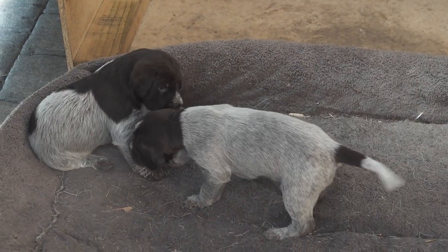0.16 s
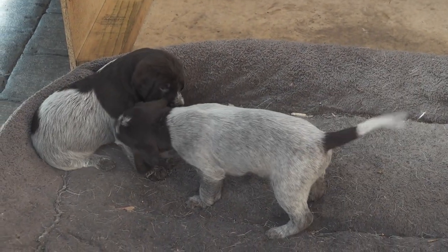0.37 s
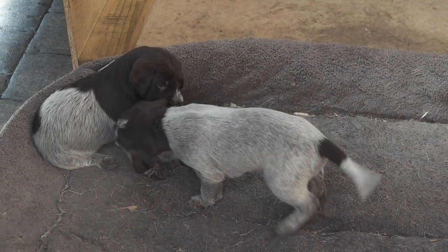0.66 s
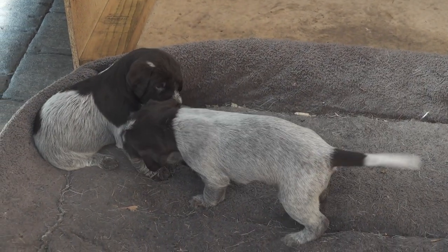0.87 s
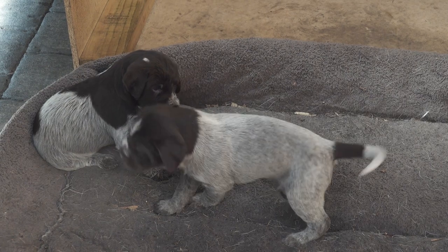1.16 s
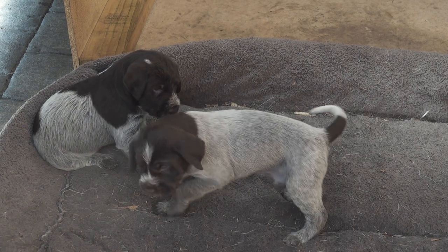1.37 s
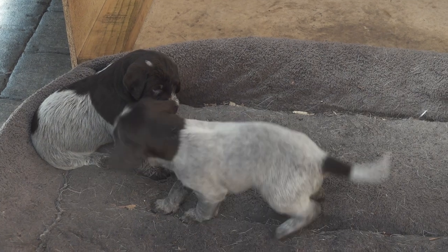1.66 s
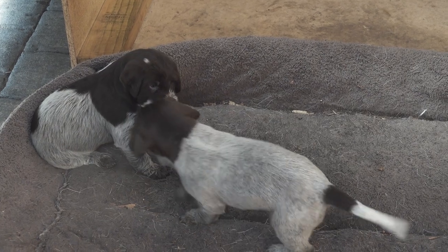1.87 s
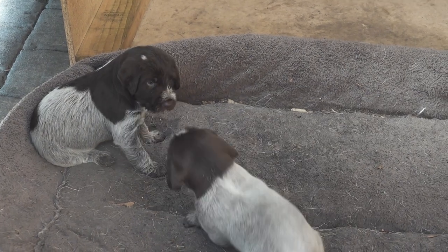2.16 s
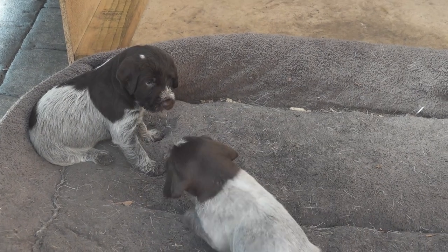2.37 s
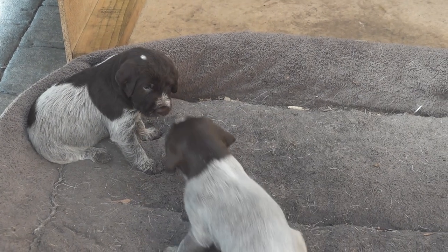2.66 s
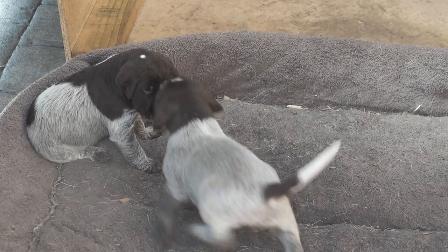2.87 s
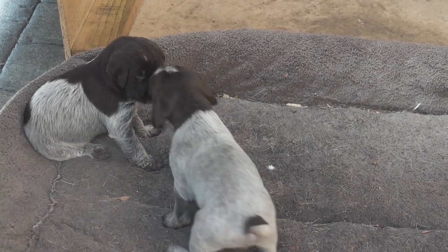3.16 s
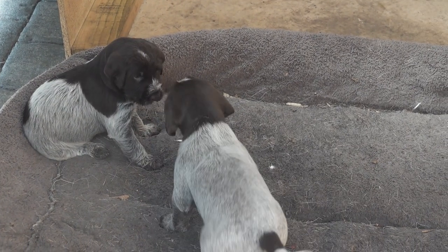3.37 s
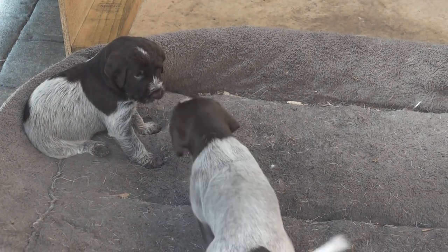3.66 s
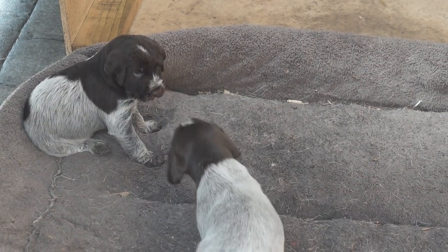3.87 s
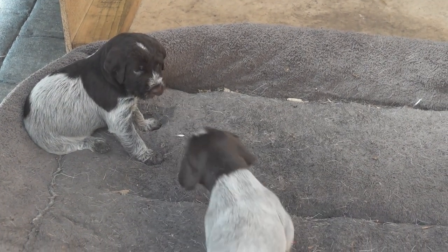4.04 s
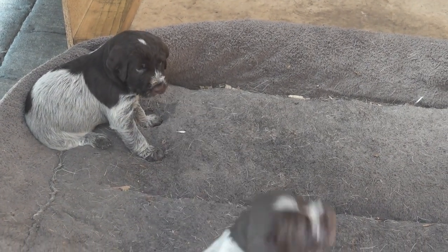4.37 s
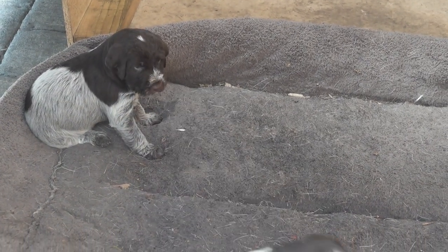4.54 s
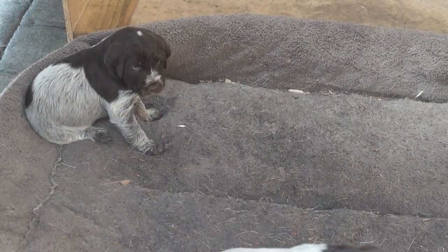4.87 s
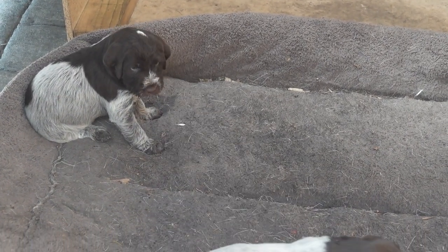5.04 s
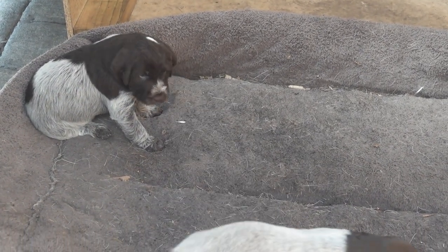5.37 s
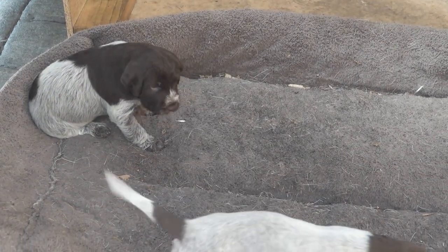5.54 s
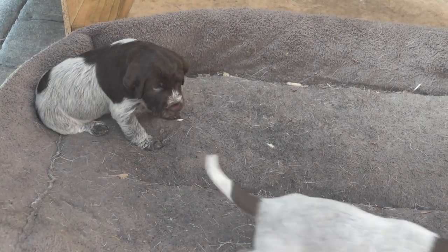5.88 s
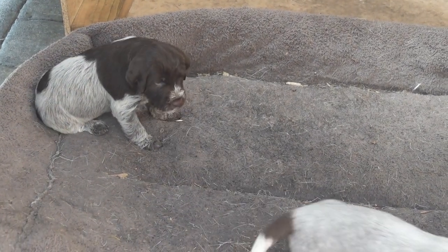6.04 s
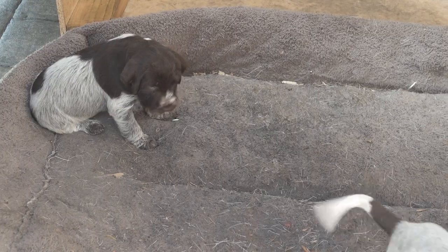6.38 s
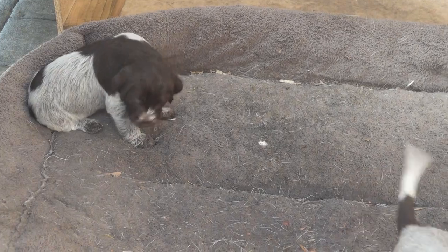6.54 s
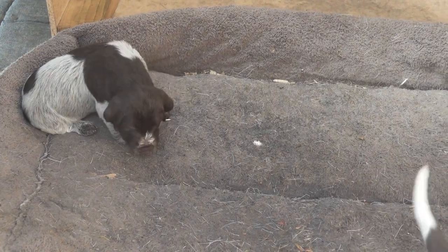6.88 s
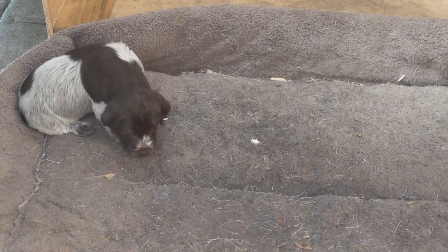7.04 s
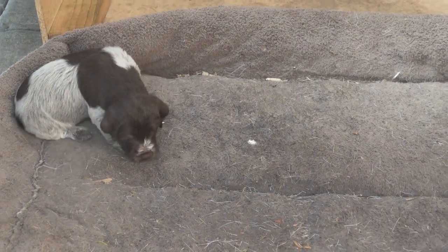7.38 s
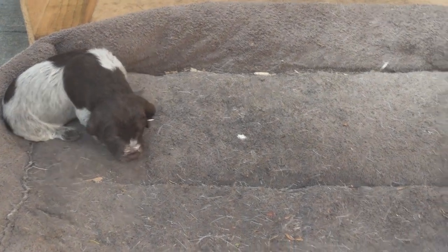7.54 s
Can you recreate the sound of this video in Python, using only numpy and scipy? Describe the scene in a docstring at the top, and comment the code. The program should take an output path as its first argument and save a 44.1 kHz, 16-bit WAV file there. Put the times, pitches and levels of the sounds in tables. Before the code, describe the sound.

Close puppy play in a small hard room: throaty growls and soft grunts, piercing squeals and yaps, then short low woofs and cloth scuffling.

```python
"""Puppies play-fighting

Two young puppies play-fight on a cloth bed in a small hard room, heard close up.
One voice model, glottal pulses and rasp through throat and mouth, makes grunts, a whimper, woofs,
grumbles, squeals and harsh yaps. Shaped noise makes sniffs, puffs of breath at the ends of two woofs,
claw ticks, scuffs, rumble and hush; decaying low sines make the paw thuds.
The sound drops out for an instant near the end."""
import sys
import numpy as np
from scipy import signal
from scipy.fft import rfft, irfft
from scipy.io import wavfile
from scipy.ndimage import uniform_filter1d, minimum_filter1d, map_coordinates

SR = 44100
rng = np.random.default_rng(int(sys.argv[2]) if len(sys.argv) > 2 else 0)


def persist_wave(psi):
    """Save psi, clipped to +-1, as 16-bit WAV."""
    counts = np.round(np.clip(psi, -1, 1) * 32767).astype(np.int16)
    wavfile.write(sys.argv[1], SR, np.atleast_2d(counts).T)


N = 339871
TOP_HZ = 15750  # nothing sounds above this

# restless low rumble, spectrum: (frequency [Hz], level [dB])
RUMBLE = [(22, -1), (40, -6), (170, -17.5), (300, -28), (700, -60)]
# fur scuffing on cloth, spectrum: (frequency [Hz], level [dB])
CLOTH = [(150, -13), (450, -2), (900, -17), (1400, -1), (4700, -13), (15500, -29.5)]
# hush of the room, spectrum: (frequency [Hz], level [dB])
AIR = [(50, -24.5), (100, -3.5), (300, -9.5), (1400, -13.5), (2400, -31), (8000, -32), (15500, -51.5)]
# decay of the room's tail: (frequency [Hz], time to fall 60 dB [s])
ROOM = [(200, 0.41), (1200, 0.47), (3500, 0.42), (12000, 0.29)]
# paws and bodies landing on the bed: (time [s], level [dB], pitch [Hz])
THUDS = [(3.119, -30, 74.5), (3.429, -35.5, 81), (7.368, -24.5, 115)]
# claw and tooth ticks, both levels before a common trim: (time [s], level [dB], knock against tick [dB])
TICKS = [(1.475, -43.5, -7), (6.296, -30, -30), (6.883, -39, -19), (7.041, -33, 6), (7.095, -33.5, -2),
         (7.26, -48, 15), (7.327, -37.5, -25)]
# sniffs, and puffs of breath at the ends of two woofs: (time [s], length [s], level [dB])
BREATHS = [(1.663, 0.097, -43.5), (2.771, 0.059, -55.5), (6.205, .12, -46.5), (6.484, 0.11, -36.5),
           (7.366, 0.19, -44)]
# hiss of the breaths, spectrum: (frequency [Hz], level [dB])
BREATH_HISS = [(700, -8), (1100, -8.5), (1700, 3), (2500, -13), (5500, -13.5), (15000, -32)]
# closed-mouth grunts: (time [s], length [s], top pitch [Hz], level [dB])
GRUNTS = [(1.149, 0.047, 196.2, -44), (1.558, 0.069, 184, -50.5), (2.463, 0.092, 245, -28.5),
          (2.538, 0.065, 234, -34), (2.957, 0.14, 223.6, -32), (3.248, 0.047, 219.6, -35.5),
          (3.487, 0.061, 239, -32.5), (4.414, 0.062, 245, -32), (4.648, 0.049, 244.3, -36.5)]
# gruff woofs: (time [s], length [s], top pitch [Hz], top level [dB], open mouth resonance [Hz],
# brightness at the start [dB])
WOOFS = [(6.112, 0.17, 232.6, -20, 950, -21), (6.447, .12, 206.7, -20.5, 935, -16),
         (6.94, .047, 195.5, -22, 610, -20.5)]
# one curve for each grumble: (time [s], pitch [Hz], roughness [0-1], level [dB])
GRUMBLES = [
    [(0.424, 426, 0.7, -26.5), (0.462, 445, 0.5, -19.5), (0.48, 381.2, 0.05, -25.5),
     (0.51, 373.6, .24, -25), (0.55, 390.4, 0.73, -25.5), (0.62, 446.5, 0.86, -23.5),
     (0.66, 410.3, 0.3, -28), (0.72, 401.5, 0, -27.5), (0.765, 399.6, 0.9, -28)],
    [(1.798, 663.3, 0.59, -28.5), (1.825, 791.5, 0.86, -21.5), (1.868, 796, .37, -13),
     (1.888, 497.6, .56, -22.5), (1.95, 347.3, 0.4, -30), (1.975, 306.3, .17, -29), (2.01, 307.7, 0.3, -27),
     (2.04, 245, 1, -33)],
]
# the mouth in each grumble: (resonance when open [Hz], time to close [s], base brightness [dB],
# lowest tone when open [Hz])
GRUMBLE_MOUTHS = [(1650, 0.061, -14, 1420), (1700, 0.11, -13, 950)]
# one curve for each squeal: (time [s], pitch [Hz], level [dB])
SQUEALS = [
    [(3.715, 763, -38), (3.753, 914, -27), (3.775, 1074, -19.5), (3.789, 1006, -15), (3.825, 958, -28),
     (3.845, 821, -25.5), (3.885, 836, -33.5)],
    [(3.895, 818, -38), (3.919, 863, -17), (3.959, 847, -20.5), (4.031, 783, -21), (4.048, 696, -18.5)],
    [(5.252, 771, -35.5), (5.284, 993, -17), (5.308, 1073, -16), (5.328, 1273, -11.5), (5.348, 1164, -14),
     (5.388, 841.3, -17), (5.44, 810, -22), (5.496, 859.7, -20.5), (5.548, 783, -24)],
]
# upper resonances over the body of each squeal while the folds are taut: (brightness [dB])
SQUEAL_BRIGHT_DB = [-3, -2.5, 1.5]
# harsh yaps: (time [s], rise [s], hold [s], fall [s], held pitch [Hz], pitch it sags toward [Hz],
# held level [dB], held roughness [0-1], held brightness [dB], mouth resonance when open [Hz], when closed [Hz])
YAPS = [(4.241, .046, .031, .118, 956.4, 459, -13.5, .3, -4, 1550, 1050),
        (5.746, .033, .09, .095, 1093, 561.3, -14.5, 0.65, -0.5, 2290, 950)]
# throat and muzzle for each way of calling, spectra: (frequency [Hz], level [dB])
GRUNT_THROAT = [(110, -5.5), (220, 1), (450, -4), (900, -17.5), (1350, -10), (2200, -38), (3400, -45.5),
                (4300, -29.5), (5800, -45), (8500, -50), (14000, -62.5)]
WOOF_THROAT = [(120, -12.5), (216, -6.5), (300, -11), (500, -9.5), (720, -6.5), (975, -34), (1350, -10.5),
               (2750, -29.5), (3300, -23), (5200, -31.5), (6400, -42), (15000, -61)]
GRUMBLE_THROAT = [(150, -9.5), (520, 6.5), (780, -5.5), (1000, -5.5), (1500, -2), (2400, -30), (3100, -29),
                  (3900, -16.5), (4800, -18.5), (5800, -42.5), (8600, -44), (10500, -61.5), (15000, -65)]
SQUEAL_THROAT = [(300, -23), (750, -2), (1300, -12.5), (1900, 0.5), (2500, -10), (2850, -11), (3400, 1.5),
                 (4400, -7), (5500, -18.5), (6500, -24), (9000, -38.5), (11000, -55), (15000, -52.5)]
YAP_THROAT = [(250, -22.5), (560, -7), (1100, -8.5), (1550, -10), (2000, -6.5), (2450, -17), (2800, -7),
              (4400, -11), (5700, -25.5), (6400, -35), (10500, -56.5), (15000, -64.5)]


def amp(db):
    """Decibels to amplitude."""
    return 10 ** (np.asarray(db) / 20)


def unit(x):
    """x scaled to rms 1."""
    return x / np.sqrt(np.mean(x ** 2) + 1e-20)


def along(points, hz):
    """(Hz, value) points read on a log frequency axis."""
    f, v = np.transpose(points)
    return np.interp(np.log(hz + 1), np.log(f + 1), v)


def wobble(rate, size):
    """A smooth random curve, rate knots a second."""
    knots = rng.standard_normal(int(size * rate / SR) + 4)
    return map_coordinates(knots, [np.arange(size) * rate / SR], mode="nearest")


def add(track, s, x):
    """Mix x into the track at time s."""
    i = round(s * SR)
    track[i:i + len(x)] += x[:len(track) - i]


def coloured(x, spectrum, size=4096):
    """x through a causal minimum-phase filter with the given (Hz, dB) shape."""
    cepstrum = irfft(np.log(amp(along(spectrum, np.fft.rfftfreq(size, 1 / SR)))))
    # folding the cepstrum onto positive time makes the filter causal
    cepstrum[1:size // 2] *= 2
    cepstrum[size // 2 + 1:] = 0
    response = irfft(np.exp(rfft(cepstrum)))
    return signal.fftconvolve(x, response)[:len(x)]


def noise(spectrum, size):
    """Coloured noise of rms 1."""
    return unit(coloured(rng.standard_normal(size), spectrum))


def band(x, hz, kind, order=4):
    """The part of x on one side of a frequency, or between two."""
    return signal.sosfiltfilt(signal.butter(order, hz, kind, fs=SR, output="sos"), x)


def steady(x, size=900):
    """x held near rms 1, keeping its fast flutter."""
    return x / np.sqrt(np.abs(uniform_filter1d(x ** 2, size)) + 1e-14)


def timeline(s, length, fade):
    """Sample times of a call, with room for its fades."""
    return np.arange(s - fade / 2, s + length + fade / 2, 1 / SR)


def curves(rows, fade):
    """Sample times of a call and the value of each column at those times."""
    s, *columns = np.transpose(rows)
    t = timeline(s[0], s[-1] - s[0], fade)
    return [t] + [np.interp(t, s, c) for c in columns]


def progress(t, s, length):
    """0 until time s, then rising evenly to 1 over the length."""
    return np.clip((t - s) / length, 0, 1)


def bed(rumble_db=-44.5, scuff_db=-62, air_db=-56, scramble_s=7.25, build_s=0.41, settle_s=0.18,
        rumble_swell_db=10, scuff_swell_db=10):
    """Uneven cloth scuffs and rumble swell as one puppy scrambles off, over the room's steady hush."""
    t = np.arange(N) / SR - scramble_s
    scramble = np.exp(-(t / np.where(t < 0, build_s, settle_s)) ** 2)
    strokes = unit(noise(CLOTH, N) * amp(3 * wobble(14, N) + 3.5 * wobble(200, N)))
    lumps = unit(noise(RUMBLE, N) * amp(2.4 * wobble(7, N)))
    scuffs = amp(scuff_db + scuff_swell_db * scramble) * strokes
    rumble = amp(rumble_db + rumble_swell_db * scramble) * lumps
    hush = amp(air_db) * noise(AIR, N)
    return scuffs + rumble + hush


def room(x, tail_db=-12.5, mode_hz=1100, mode_db=6):
    """A diffuse tail in which each frequency dies at its own speed and one narrow band rings out."""
    hz, t, z = signal.stft(rng.standard_normal(SR), SR, nperseg=256)
    decay = amp(-60 * t / along(ROOM, hz)[:, None])
    tail = signal.istft(z * decay, SR, nperseg=256)[1]
    tail = tail / np.linalg.norm(tail)
    tail = tail + amp(mode_db) * signal.lfilter(*signal.iirpeak(mode_hz, 20, SR), tail)
    late = np.pad(tail, (SR // 100, 0))  # the tail waits 10 ms
    return x + signal.fftconvolve(x, amp(tail_db) * late)[:N]


def walls(x, count=8):
    """Floor and near walls answer within a few milliseconds, so gliding harmonics swell and dip."""
    out = x.copy()
    for delay, sign in zip(rng.uniform(.001, .016, count), rng.choice([-1, 1], count)):
        add(out, delay, .2 * sign * x)
    return out


def thuds(swell_s=0.015):
    """Paws and bodies land on padding: each low tone swells softly and dies away."""
    track, t = np.zeros(N), np.arange(SR // 5) / SR
    for s, db, hz in THUDS:
        swell = (t / swell_s) ** 2 * np.exp(2 * (1 - t / swell_s))
        add(track, s, amp(db) * np.sin(2 * np.pi * hz * t) * swell)
    return track


def ticks(t60_s=0.063, tick_db=-6, knock_db=-6):
    """Claws and teeth tick: a dry burst of noise and a lower knock decay together."""
    track, t = np.zeros(N), np.arange(SR // 5) / SR
    for s, db, knock in TICKS:
        tick = unit(band(rng.standard_normal(len(t)), [1100, 6000], "band", order=1))
        thump = unit(band(rng.standard_normal(len(t)), [400, 1200], "band", order=1))
        mix = amp(tick_db) * tick + amp(knock + knock_db) * thump
        add(track, s, amp(db - 60 * t / t60_s) * mix)
    return track


def breaths():
    """Short hisses of breath: sniffs and the airy ends of woofs."""
    track = np.zeros(N)
    for s, length, db in BREATHS:
        n = int(length * SR)
        add(track, s, amp(db) * noise(BREATH_HISS, n) * signal.windows.tukey(n, .5))
    return track


def folds(pitch, rough, doubling=0.65, shimmer_db=4.5, leak=.045):
    """Glottal pulses; with roughness they waver, alternate strong and weak, then break into pulsed noise."""
    n = len(pitch)
    rough = np.clip(rough, 0, .97)
    hz = pitch * (1 + rough * (.065 * wobble(600, n) + .03 * wobble(110, n)))
    phase = 2 * np.pi * np.cumsum(hz) / SR
    # soft folds close gradually: random lags smear each pulse
    lags = rng.uniform(0, 2 * np.pi, int(TOP_HZ / hz.min()))
    pulses = np.zeros(n)
    for k, lag in enumerate(lags, 1):
        below_top = np.clip((TOP_HZ - k * hz) / hz, 0, 1)
        pulses += np.cos(k * phase + lag) * below_top
    # half the pitch rate makes every other pulse weaker
    pulses = steady(pulses) * (1 + doubling * rough * np.cos(phase / 2 + wobble(60, n)))
    rasp = unit(rng.standard_normal(n) * (1 + np.cos(phase) / 2))
    chaos = rough ** 2.6
    shimmer = amp(shimmer_db * rough * wobble(130, n))
    return (np.sqrt(1 - chaos ** 2) * pulses + (leak + chaos) * rasp) * shimmer


def mouth(x, lowest_hz, centre_hz, boost_db, octaves=0.54, size=256):
    """A resonance moves with the jaw, smaller ones with tongue and lips; the bass below the lowest tone thins."""
    hz, s, z = signal.stft(x, SR, nperseg=size)
    centre, lowest = [np.interp(s * SR, np.arange(len(x)), c) for c in (centre_hz, lowest_hz)]
    hz = hz[:, None] + 1
    jaw = amp(boost_db / (1 + (np.log2(hz / centre) / octaves) ** 2))
    shifting = uniform_filter1d(rng.standard_normal(z.shape), size=3, axis=0)
    shifting = uniform_filter1d(shifting, size=16, axis=1)
    tongue = amp(4.5 * unit(shifting) * hz / (hz + 1000))
    low_cut = 1 / np.sqrt(1 + (.62 * lowest / hz) ** 8)
    return signal.istft(z * jaw * tongue * low_cut, SR, nperseg=size)[1][:len(x)]


def call(throat, pitch, rough, level, bright, centre, boost_db, fade, lowest_hz=0):
    """Folds through throat and open mouth; brightness sets the upper resonances against the body of the voice."""
    source = coloured(folds(pitch, rough), throat)
    voice = walls(mouth(source, np.maximum(pitch, lowest_hz), centre, boost_db))
    body = band(voice, 2058, "low", order=8)
    upper = voice - body
    t = np.arange(len(voice)) / SR
    fades = np.clip(np.minimum(2 * t, t[-1] - t) / fade, 0, 1)  # in twice as fast as out
    return (steady(body) + amp(bright) * steady(upper)) * amp(level) * fades


def grunts(rough=0.52, sag=0.29):
    """Pitch and loudness rise and fall together with one short push of the chest."""
    track = np.zeros(N)
    for s, length, hz, db in GRUNTS:
        push = np.sin(np.pi * np.linspace(0, 1, int(length * SR))).clip(0)
        pitch = hz * (1 - sag * (1 - push))
        voice = walls(coloured(folds(pitch, rough), GRUNT_THROAT))
        add(track, s, unit(voice) * amp(db) * push)
    return track


def whimper(s=4.905, length=.14, start_hz=640, end_hz=562, lift_hz=175, skew=.8, rough=0.089,
            level_db=-31, bright_db=-14, lift_db=8, fade=0.0086):
    """A soft, clean arch of pitch peaks early, brightest at its top; the mouth rings at the second harmonic."""
    track, t = np.zeros(N), timeline(s, length, fade)
    u = progress(t, s, length)
    lift = np.sin(np.pi * u ** skew) ** 2
    pitch = start_hz + (end_hz - start_hz) * u + lift_hz * lift
    bright = bright_db + lift_db * lift
    add(track, t[0], call(GRUMBLE_THROAT, pitch, rough, level_db, bright, 2 * pitch, boost_db=8.5, fade=fade))
    return track


def woofs(sag=.09, swell_db=11, edge_rough=0.58, peak_rough=0.93, closed_hz=520, opening_s=0.037,
          brighten_db_per_s=45, fade=.018):
    """One chest push swells level, pitch and roughness; the jaw opens early and the sound brightens to its end."""
    track = np.zeros(N)
    for s, length, hz, db, open_hz, bright_db in WOOFS:
        t = timeline(s, length, fade)
        push = np.sin(np.pi * progress(t, s, length))
        pitch = hz * (1 - sag * (1 - push))
        rough = edge_rough + (peak_rough - edge_rough) * push
        level = db - swell_db * (1 - push)
        centre = closed_hz + (open_hz - closed_hz) * progress(t, s, opening_s)
        bright = bright_db + brighten_db_per_s * (t - s)
        add(track, t[0], call(WOOF_THROAT, pitch, rough, level, bright, centre, boost_db=13.5, fade=fade))
    return track


def grumbles(closed_hz=760, bright_db_per_octave=1.0, bright_per_db=0.31, dull_db_per_s=14, fade=.008):
    """The jaw starts wide, thinning the bass, then closes; high and loud is brighter, and the voice dulls with age."""
    track = np.zeros(N)
    for rows, (open_hz, close_s, bright_db, lowest_hz) in zip(GRUMBLES, GRUMBLE_MOUTHS):
        t, pitch, rough, level = curves(rows, fade)
        age = t - t[0]
        gape = 1 / (1 + (age / close_s) ** 6)
        centre = closed_hz + (open_hz - closed_hz) * gape
        bright = bright_db + bright_db_per_octave * np.log2(pitch / 400)
        bright = bright + bright_per_db * (level - level.mean()) - dull_db_per_s * age
        voice = call(GRUMBLE_THROAT, pitch, rough, level, bright, centre, boost_db=7, fade=fade,
                     lowest_hz=lowest_hz * gape)
        add(track, t[0], voice)
    return track


def squeals(clean=.06, slack_rough=.12, slack_db=-10, slack_octaves_per_s=6, mouth_hz=1400,
            mouth_follows=1.0, fade=.008):
    """Taut folds ring clean and bright, slackening dull and rough as pitch falls; the mouth opens with pitch."""
    track = np.zeros(N)
    for rows, bright_db in zip(SQUEALS, SQUEAL_BRIGHT_DB):
        t, pitch, level = curves(rows, fade)
        falling = -np.gradient(np.log2(pitch), t)  # octaves per second
        slack = uniform_filter1d(np.clip(falling / slack_octaves_per_s, 0, 1), size=900)
        rough = clean + slack_rough * slack
        bright = bright_db + slack_db * slack
        centre = mouth_hz * (pitch / 850) ** mouth_follows
        add(track, t[0], call(SQUEAL_THROAT, pitch, rough, level, bright, centre, boost_db=9.0, fade=fade))
    return track


def yaps(start_hz=430, sag_s=.035, attack_s=.014, attack_db=-9, release_db=-21, start_rough=.68, end_rough=.9,
         start_dull_db=-4.0, end_dull_db=-6.0, thin=1.19, fade=0.00799):
    """A rasp leaps to a held scream, thin in the bass, then breaks, sags and dies away; the jaw closes all along."""
    track = np.zeros(N)
    for s, rise, hold, fall, hz, end_hz, db, held_rough, bright_db, open_hz, closed_hz in YAPS:
        length = rise + hold + fall
        t = timeline(s, length, fade)
        leap = progress(t, s, rise) ** 2
        release = progress(t, s + rise + hold, fall)
        broken = 1 - np.exp(-release * fall / sag_s)
        pitch = start_hz + (hz - start_hz) * leap + (end_hz - hz) * broken
        rough = np.where(release > 0, end_rough, np.where(leap < 1, start_rough, held_rough))
        level = db + attack_db * (1 - progress(t, s, attack_s)) + release_db * release ** 2
        bright = bright_db + start_dull_db * (1 - leap) + end_dull_db * release
        centre = open_hz + (closed_hz - open_hz) * progress(t, s, length)
        voice = call(YAP_THROAT, pitch, rough, level, bright, centre, boost_db=9, fade=fade,
                     lowest_hz=thin * hz * (1 - broken))
        add(track, t[0], voice)
    return track


def scene():
    """Both puppies in the room, over the sounds of the bed."""
    voice = grunts() + whimper() + woofs() + grumbles() + squeals() + yaps()
    return (bed() + room(thuds() + ticks() + breaths() + voice))[None]


def record(dry):
    """A limiter holds the loudest peaks, the sound drops out for an instant, and the top is cut."""
    gain = minimum_filter1d(1 / np.maximum(np.abs(dry), 1), size=400)
    gain = uniform_filter1d(gain, size=200)
    live = np.interp(np.arange(N) / SR, [7.54, 7.548, 7.567, 7.571], [1, 0, 0, 1])
    below_top = np.fft.rfftfreq(N, 1 / SR) < TOP_HZ
    return irfft(rfft(dry * gain * live) * below_top, N)


dry = scene()
out = record(dry)
persist_wave(out)
```